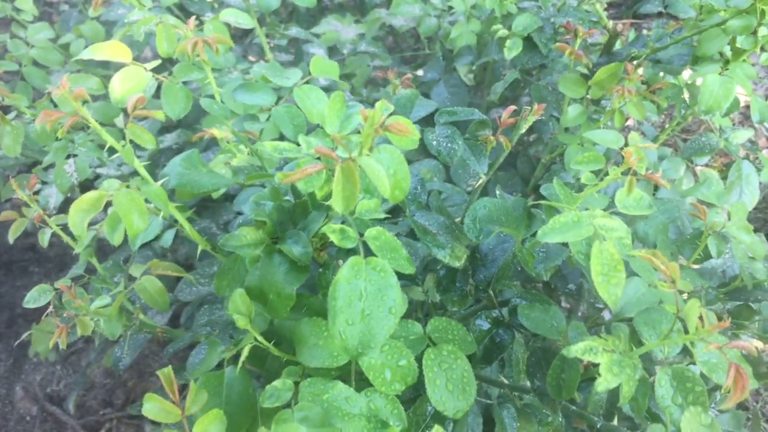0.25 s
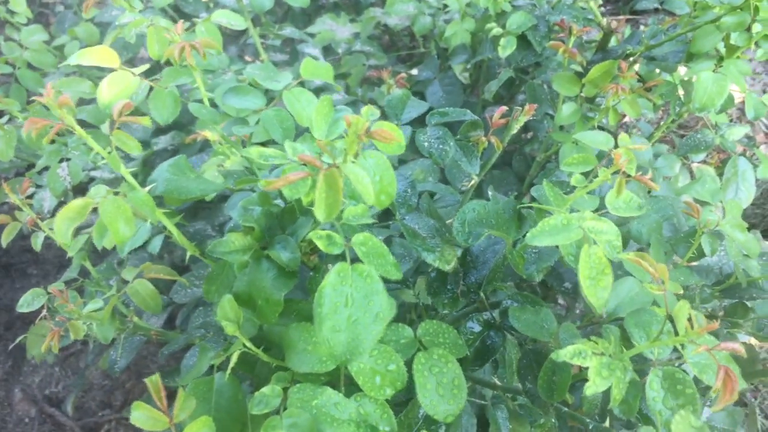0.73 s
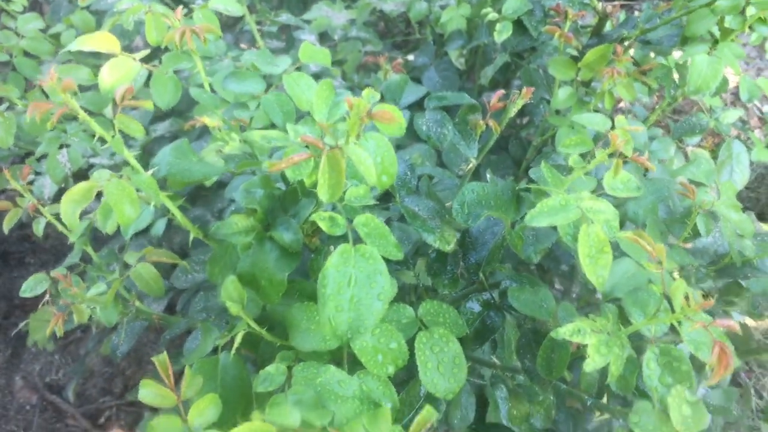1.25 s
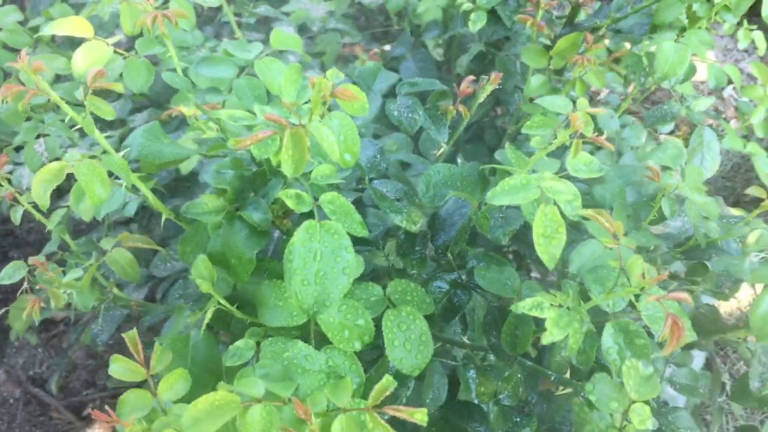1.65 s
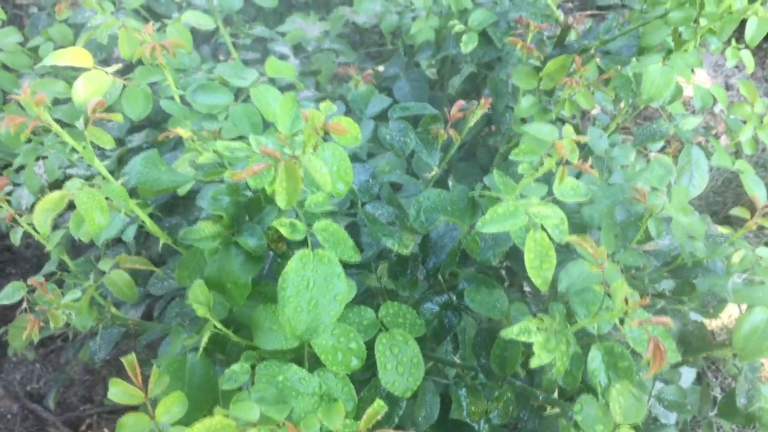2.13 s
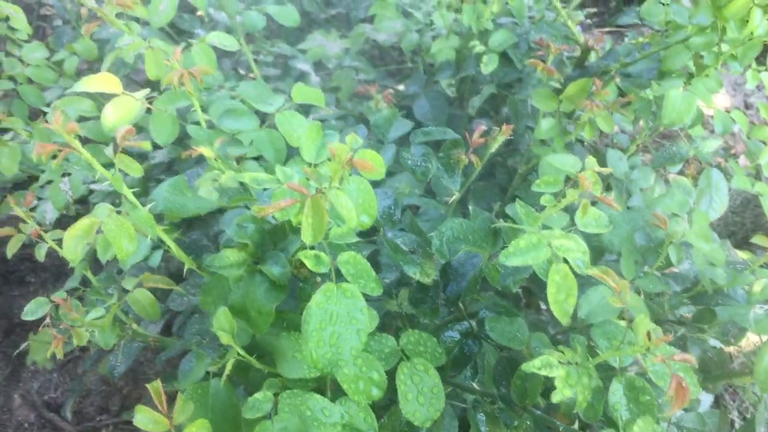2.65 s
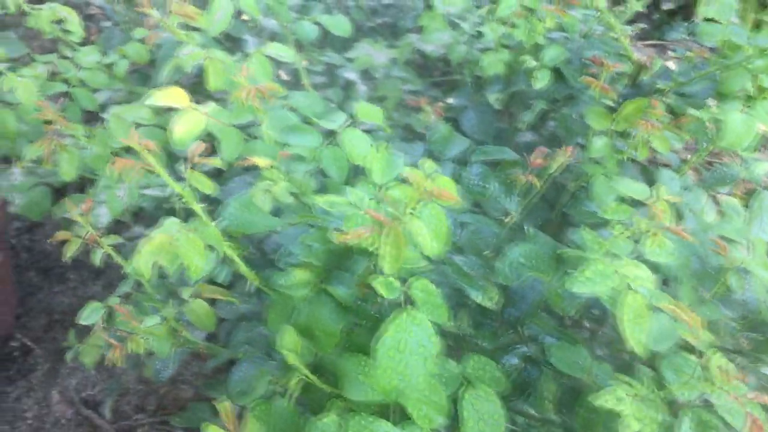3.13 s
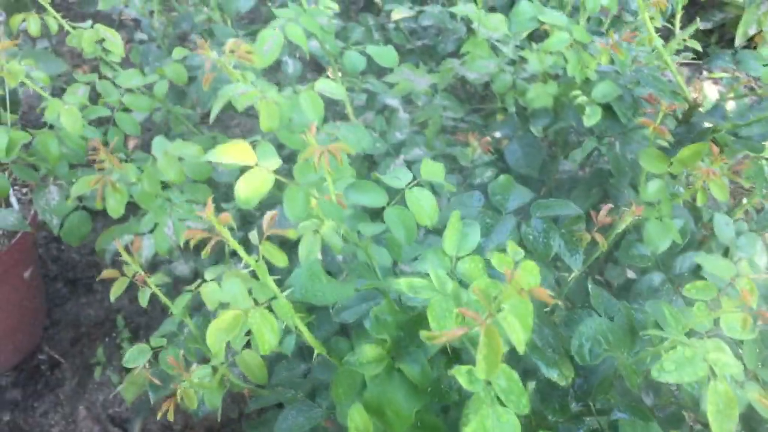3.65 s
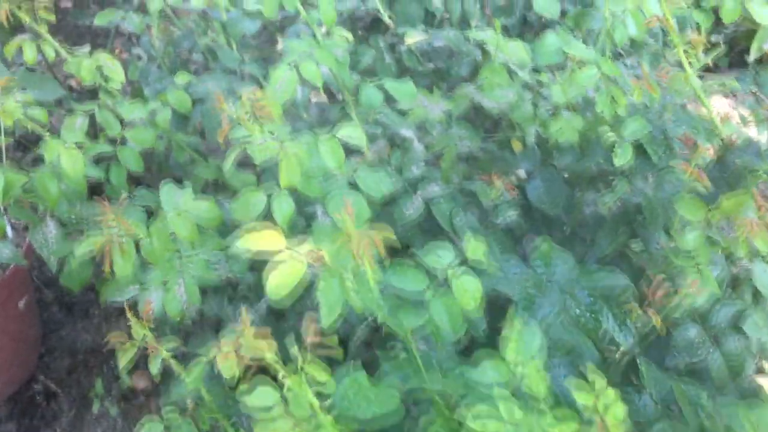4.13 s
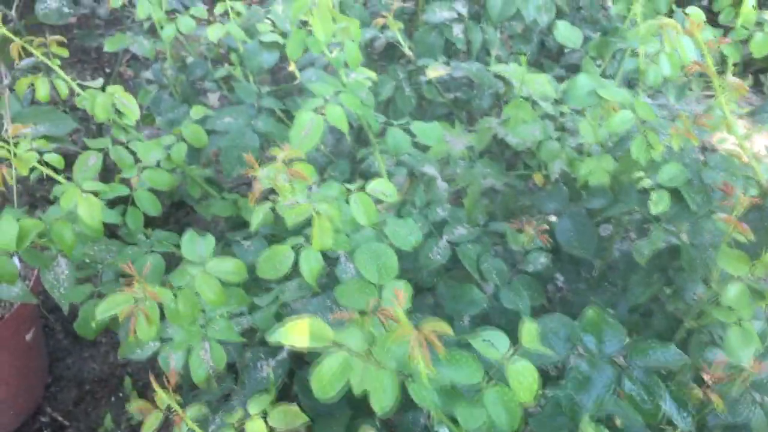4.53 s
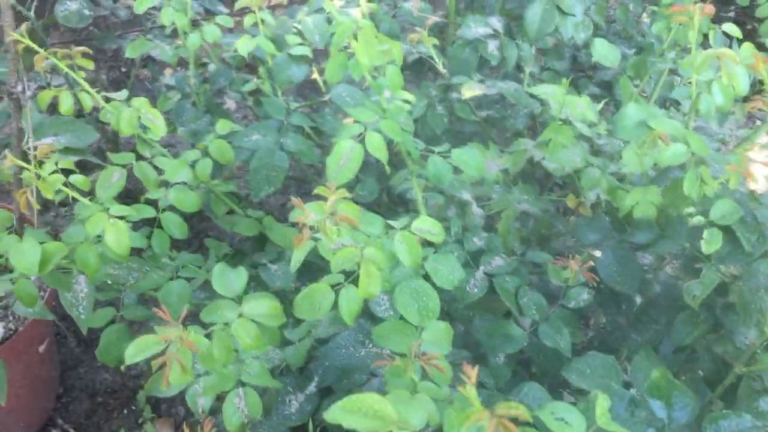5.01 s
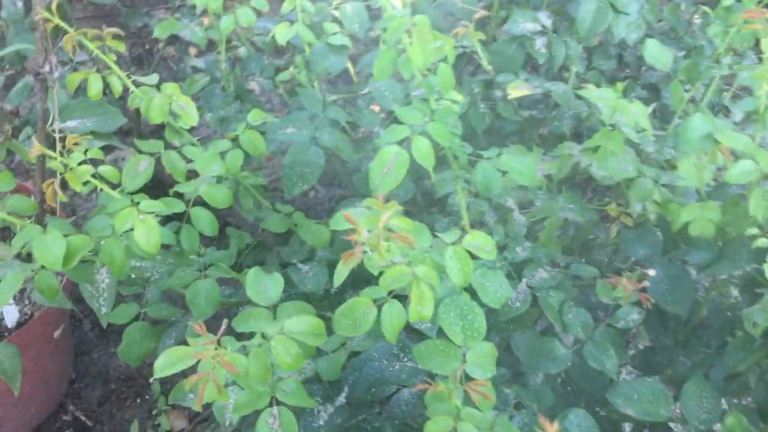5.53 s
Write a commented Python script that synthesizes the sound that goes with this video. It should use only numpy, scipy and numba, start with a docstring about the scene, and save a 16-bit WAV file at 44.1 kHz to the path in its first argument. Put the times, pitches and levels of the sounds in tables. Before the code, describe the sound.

Close, continuous spray hiss and fine leaf patter outdoors, swelling near the end, with occasional small bird chirps and distant low traffic.

```python
"""A pressure sprayer mists a rose bush an arm's length from a hand-held microphone.
From the start the nozzle hisses (shaped noise), fine drops patter on leaves (random clicks) and far
traffic drones (tones and blurred noise). A thin whine drifts in and out until 2.45 s; a sparrow's gliding
sines chirp near 0.2, 1.2, 2.3 and 4.2 s; a soft bump falls at 1.6 s; from 5.3 s the patter swells
as the wand comes round. The one microphone feeds the left channel only."""
import sys
import numpy as np
from scipy import signal
from scipy.fft import rfft, irfft, next_fast_len
from scipy.io import wavfile
from scipy.ndimage import uniform_filter1d
from numba import njit

SR = 44100
rng = np.random.default_rng(int(sys.argv[2]) if len(sys.argv) > 2 else 0)


def unload_wav(signal):
    """Save mono or channel-first audio to the path in sys.argv[1] as 16-bit WAV at rate SR, clipped to [-1, 1]."""
    wavfile.write(
        sys.argv[1],
        SR,
        np.round(np.clip(np.atleast_2d(signal).T, -1, 1) * 32767).astype(np.int16),
    )


N = 254545
T = np.arange(N) / SR  # time in s
# Source levels are in dB before record(), which sums two equal copies of the air (+6 dB).


def undb(db):
    """Amplitude factor of a level in dB."""
    return 10 ** (np.asarray(db) / 20)


def unit(x):
    """Scale to an RMS of 1."""
    return x / np.sqrt(np.mean(x ** 2))


def curves(table):
    """Columns of a table after its first (start_s), joined by straight lines in time."""
    start_s, *columns = np.transpose(table)
    return [np.interp(T, start_s, column) for column in columns]


@njit
def svf(x, hz, width):
    """State-variable band-pass with a moving centre, gain 1 there; width in Hz."""
    y = np.empty(len(x))
    band, low = 0., 0.
    for i in range(len(x)):
        g = np.tan(np.pi * hz[i] / SR)
        damping = width / hz[i]
        v = (band + g * (x[i] - low)) / (1 + g * (g + damping))
        band = 2 * v - band
        low = low + 2 * g * v
        y[i] = damping * v
    return y


def lift(x, hz, width, db):
    """Raise or lower x by db around hz, by adding a band-passed share of itself."""
    return x + (undb(db) - 1) * svf(x, hz + np.zeros(N), float(width))


def walk(rate):
    """Wandering curve of RMS near 1: random values held 1 / rate s, smoothed twice."""
    hold = int(SR / rate)
    steps = np.repeat(rng.standard_normal(N // hold + 1), hold)
    smooth = uniform_filter1d(uniform_filter1d(steps, hold), hold)
    return unit(smooth[:N])


def bands(x, spectrum, shared_db, own_db, rate, tilt_db=0):
    """Colour x to unit level and split it in half octaves that flicker together and alone."""
    size = next_fast_len(N)
    octave = np.log2(np.maximum(np.fft.rfftfreq(size, 1 / SR), 1))
    hz, db = np.transpose(spectrum)
    coloured = rfft(x, size) * undb(np.interp(octave, np.log2(hz), db, left=-90))
    coloured = coloured / irfft(coloured, size).std()
    out, shared = 0, shared_db * walk(rate)
    for centre in np.arange(4.5, 14.6, .5):  # octaves above 1 Hz
        fade = np.cos(np.pi * np.clip(octave - centre, -.5, .5)) ** 2
        top = np.clip(centre - 12, 0, 1)  # tilt begins at 4096 Hz, full from 8192 Hz
        level_db = shared + own_db * walk(rate) + top * tilt_db
        out = out + irfft(coloured * fade, size)[:N] * undb(level_db)
    return out


def glide(start, length, first_hz, last_hz, attack, release):
    """Pitch sliding from first to last, how far along it is (0-1), and a gate with soft ends."""
    along = np.clip((T - start) / length, 0, 1)
    rise = (T - start) / attack
    fall = (start + length - T) / release
    gate = np.clip(np.minimum(rise, fall), 0, 1)
    return first_hz + (last_hz - first_hz) * along, along, gate


def jet(tilt_db):
    """Turbulence at the nozzle: flickering shaped noise with a narrow, wandering ring."""
    # hiss spectrum: pitch_hz [Hz], density_db [relative dB per Hz]
    hiss_spectrum = [(120, -61), (200, -23.5), (450, -22), (640, -15), (850, -10), (1400, -3.5), (2210, -2),
                     (3200, -3), (4400, -5), (5000, -10.5), (6760, -10.5), (9400, -16.5), (10700, -16),
                     (14100, -14.5), (16500, -18.5)]
    # the nozzle's own ring in the hiss: start_s [s], centre_hz [Hz], lift_db [dB]
    nozzle_ring = [(0, 2700, -2.5), (.5, 2600, 3.5), (1, 2650, 4.5), (1.3, 2670, 4), (1.55, 2640, 0.5),
                   (1.8, 2650, 4), (2.05, 2720, -0.5), (2.3, 2700, 0.5), (2.7, 2690, 2), (3.2, 2660, 3),
                   (3.7, 2690, 4), (4.2, 2720, 1), (4.8, 2700, 1), (5.3, 2740, -0.5), (5.77, 2730, 1)]
    sputter_db, sputters_per_s = 0.44, 90  # the whole jet flutters quickly
    hiss = bands(rng.standard_normal(N), hiss_spectrum, shared_db=0.13, own_db=0.74, rate=25.0,
                 tilt_db=tilt_db)
    ring_hz, ring_db = curves(nozzle_ring)
    ringing = lift(hiss, ring_hz * (1 + .02 * walk(5.14)), 240, ring_db)
    return ringing * undb(sputter_db * walk(sputters_per_s))


def leaf_patter():
    """Fine drops on leaves: a dense hail of random clicks in the leaves' colour."""
    # leaf spectrum: pitch_hz [Hz], density_db [relative dB per Hz]
    leaf_spectrum = [(100, -36), (250, -8), (600, -1.5), (1000, 1), (1600, 0.5), (2500, -2.5), (4000, -3.5),
                     (5500, -9), (8000, -10), (16000, -11.5)]
    drops_per_s, drop_spread_db = 12000, 1
    hits = rng.random(N) < drops_per_s / SR
    drops = hits * rng.standard_normal(N) * undb(drop_spread_db * rng.exponential(size=N))
    return bands(drops, leaf_spectrum, shared_db=0.7, own_db=1.1, rate=22.)


def heavy_drips():
    """Heavier drops on broad leaves: sparser clicks ring a low band whose pitch wanders."""
    drips_per_s, drip_hz = 500, 326
    drips = (rng.random(N) < drips_per_s / SR) * rng.standard_normal(N)
    return unit(svf(drips, drip_hz * undb(2.2 * walk(30.)), 164.0))


def drift_treble(x):
    """Four treble bands rise and dip slowly, their centres wandering a little."""
    # the bands: centre_hz [Hz], width_hz [Hz]
    treble_bands = [(6300, 1300), (7650, 700), (9400, 1400), (10500, 800)]
    # their course: start_s [s], then lift_db [dB] of each of the four bands
    treble_levels = [(0, -1, 0.5, 1, 0), (.6, 1.5, 3.5, -0.5, -1), (1.2, 0.5, 2, -0.5, -2),
                     (1.7, -1, -1, -1.5, -1.2), (2.1, -3.5, -4, 4, 0.85), (2.5, -3, -5, 3, 0.8),
                     (3, -2.5, -2, -2.5, -1), (3.6, -1, -6, -2.5, -1), (3.85, -6.5, -2.5, 2, 1),
                     (5.2, -8, 0, 3, 1), (5.45, -5, -0.5, 1.5, 0), (5.77, -7, 0, 1, 1)]
    for (hz, width), db in zip(treble_bands, curves(treble_levels)):
        x = lift(x, hz * (1 + 0.017 * walk(1.4)), width, db)
    return x


def spray():
    """Jet, patter and drips balanced in time; louder patter goes with a duller jet."""
    # spray levels near the bush: start_s [s], jet_db [dB], fine_patter_db [dB], heavy_drips_db [dB]
    spray_levels = [(0, -44.5, -55, -62), (.3, -45, -52.5, -61.5), (.6, -46, -55, -69), (.9, -47, -53, -70),
                    (1.15, -47, -62, -67), (1.4, -46, -59, -73), (1.7, -44.5, -54.5, -64.5),
                    (2.35, -46, -56.5, -62.5), (2.75, -46.5, -57, -68), (3.3, -47, -62, -76),
                    (4.1, -47.5, -60.5, -78), (4.9, -47, -61.5, -69.5), (5.15, -45.5, -55, -77),
                    (5.3, -45, -48.5, -59), (5.374, -44, -50, -64), (5.382, -42.5, -45, -68),
                    (5.43, -43, -43.5, -62), (5.55, -43.5, -43.5, -63), (5.63, -45, -43, -59),
                    (5.7, -44, -44, -61), (5.77, -42, -43, -52.5)]
    usual_patter_db, dulling = -56, -0.17  # dulling: dB of jet treble per dB of patter
    jet_db, patter_db, drip_db = curves(spray_levels)
    tilt_db = dulling * (patter_db - usual_patter_db)
    mist = undb(jet_db) * jet(tilt_db)
    drops = undb(patter_db) * leaf_patter() + undb(drip_db) * heavy_drips()
    return drift_treble(mist + drops)


def traffic():
    """Far engine drones, part tone and part blur, that waver over a broad rumble."""
    # rumble spectrum: pitch_hz [Hz], density_db [relative dB per Hz]
    rumble_spectrum = [(15, -50), (25, -29), (40, -5), (76, -0.5), (102, -1), (161, -9), (300, -11.5),
                       (390, -30)]
    # engines far off that swell and fade:
    # start_s [s], length_s [s], first_pitch_hz [Hz], last_pitch_hz [Hz], level_db [dB]
    engines = [(-.2, 1.25, 69.84, 78.65, -65), (0, 2.1, 98, 101.9, -74), (1.09, 0.29, 71.7, 71.5, -69),
               (1.5, 0.37, 76, 79.3, -61.5), (2.148, 1.4, 77, 83, -62.5), (2.15, 0.49, 55.7, 58.4, -68),
               (2.806, 0.36, 102, 111.8, -61.5), (3.723, 1.9, 61.9, 65.7, -66),
               (4.307, 0.21, 63.8, 67, -56), (5.3, 0.93, 79, 94, -71)]
    rumble_db = -66.5
    swell_s, waver_db, wavers_per_s = .12, 2.0, 12
    rumble = bands(rng.standard_normal(N), rumble_spectrum, shared_db=2.5, own_db=2.5, rate=7.4)
    out = undb(rumble_db) * rumble
    for start, length, first_hz, last_hz, db in engines:
        hz, _, gate = glide(start, length, first_hz, last_hz, swell_s, swell_s)
        tone = np.sqrt(2) * np.sin(2 * np.pi * np.cumsum(hz) / SR)
        blur = unit(svf(svf(rng.standard_normal(N), hz, 25.0), hz, 31.0))
        engine = undb(-3.0) * tone + undb(-3.5) * blur
        out = out + gate * undb(db + waver_db * walk(wavers_per_s)) * engine
    return out


def whine():
    """A thin, slightly unsteady tone: noise through a very narrow moving band."""
    # the tone's course: start_s [s], pitch_hz [Hz], level_db [dB]
    whine_course = [(0, 1490, -77), (.3, 1470, -58), (.5, 1510, -56), (.6, 1560, -83), (.8, 1498, -62),
                    (1.5, 1452, -60.5), (2.1, 1444, -64), (2.35, 1456, -58), (2.45, 1520, -75)]
    hz, db = curves(whine_course)
    gate = np.clip((whine_course[-1][0] - T) / 0.11, 0, 1)  # fades out over the last 0.11 s
    tone = unit(svf(rng.standard_normal(N), hz * (1 + 0.0045 * walk(6.44)), 17.0))
    return gate * undb(db) * tone


def sparrow():
    """Gliding near-sine notes that warble and throb, with a short scatter off the garden walls."""
    # notes: start_s [s], length_s [s], first_pitch_hz [Hz], last_pitch_hz [Hz],
    # level_db [dB RMS at the note's start, before the throb], warble [depth factor on pitch]
    notes = [(0.218, 0.02, 3150, 3170, -50, .005), (0.227, 0.05, 3910, 3870, -43.5, .008),
             (0.264, 0.038, 3830, 3650, -49, 0.015), (.296, .036, 3600, 3500, -52, .01),
             (.25, .056, 3480, 3120, -47.5, .04), (1.163, 0.04, 4000, 4000, -55, .002),
             (2.271, 0.072, 2070, 1970, -54.5, .02), (2.308, 0.048, 4500, 4410, -50, 0.012),
             (2.328, 0.028, 3950, 4000, -53, 0.04), (2.356, 0.028, 4040, 3670, -46.5, 0.04),
             (2.372, 0.049, 3150, 3000, -46, 0.1), (4.148, 0.052, 4540, 4400, -48, 0.03),
             (4.174, 0.027, 4400, 3650, -49, 0.054), (4.192, .086, 3870, 3003, -45, 0.064)]
    attack_s, release_s, fade_db, throb_db = 0.006, 0.011, 4, 2.4
    scatter_db, decay_s = -5.0, 0.32  # decay_s: time to fall 60 dB
    song, shake, throb = 0, walk(1200.), walk(400.)
    shake = shake - uniform_filter1d(shake, size=SR // 220)  # quick warble only, the glide keeps its course
    for start, length, first_hz, last_hz, level_db, warble in notes:
        hz, along, gate = glide(start, length, first_hz, last_hz, attack_s, release_s)
        warbled_hz = hz * (1 + warble * shake)
        loudness = undb(level_db - fade_db * along + throb_db * throb)
        song = song + gate * loudness * np.sin(2 * np.pi * np.cumsum(warbled_hz) / SR)
    tail = rng.standard_normal(SR // 2) * undb(-60 * T[:SR // 2] / decay_s)
    scatter = signal.fftconvolve(song, tail / np.linalg.norm(tail))[:N]
    return np.sqrt(2) * song + undb(scatter_db) * scatter


def thumps():
    """A soft, low bump: a short sine under a half-sine swell."""
    # bumps: start_s [s], peak_db [dB], pitch_hz [Hz], length_s [s]
    bumps = [(1.572, -59, 218, 0.077)]
    out = 0
    for start, db, hz, length in bumps:
        age = np.clip(T - start, 0, length)
        out = out + undb(db) * np.sin(np.pi * age / length) * np.sin(2 * np.pi * hz * age)
    return out


def scene():
    """All sources in the air, as two equal channels."""
    air = spray() + traffic() + whine() + sparrow() + thumps()
    return np.array([air, air])


def record(dry):
    """The capsule's housing colours the sound, all of it lands on the left, and the top is cut."""
    # resonances of the capsule's housing: centre_hz [Hz], width_hz [Hz], lift_db [dB]
    capsule = [(1440, 260, 0.5), (2000, 440, 2), (2370, 480, -2.5), (2743, 154, 2.5), (4770, 990, -1.5),
               (9100, 1900, 5), (10480, 620, -5.5)]
    top_hz = 15750
    left = dry.sum(axis=0)
    for hz, width, db in capsule:
        left = lift(left, hz, width, db)
    low_pass = signal.ellip(12, .2, 80, top_hz, fs=SR, output="sos")  # 0.2 dB ripple, 80 dB stop
    left = signal.sosfilt(low_pass, left)
    return np.array([left, 0 * left])


dry = scene()
out = record(dry)
unload_wav(out)
```